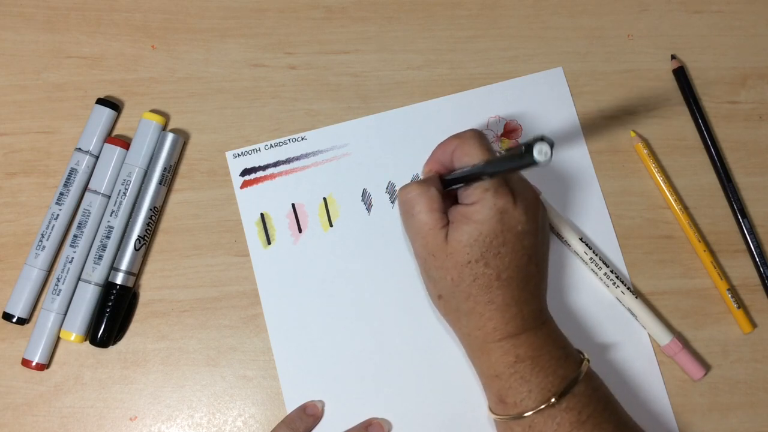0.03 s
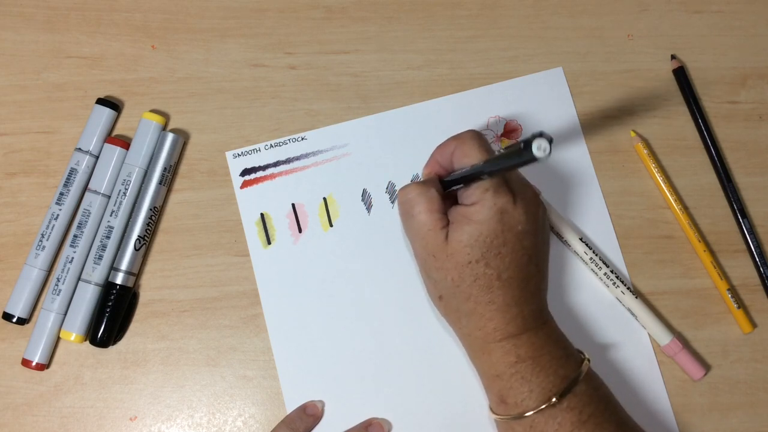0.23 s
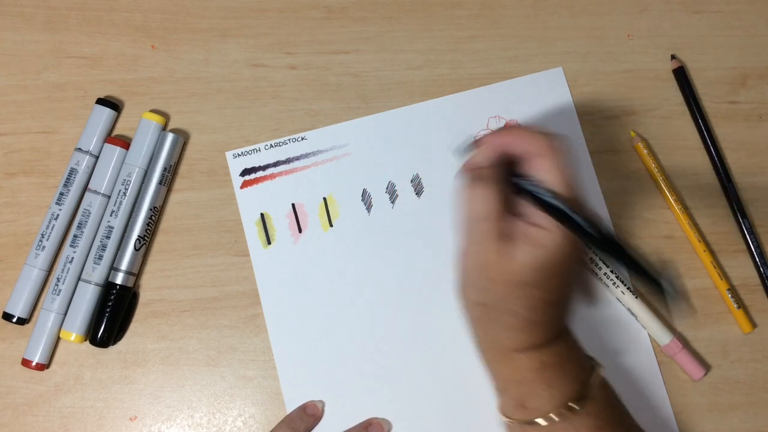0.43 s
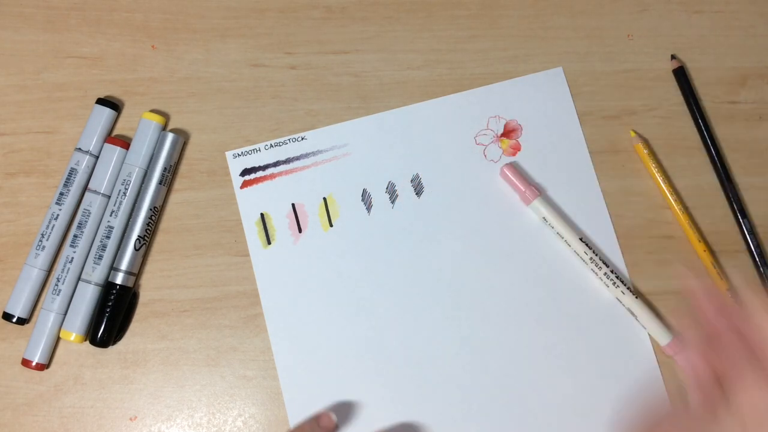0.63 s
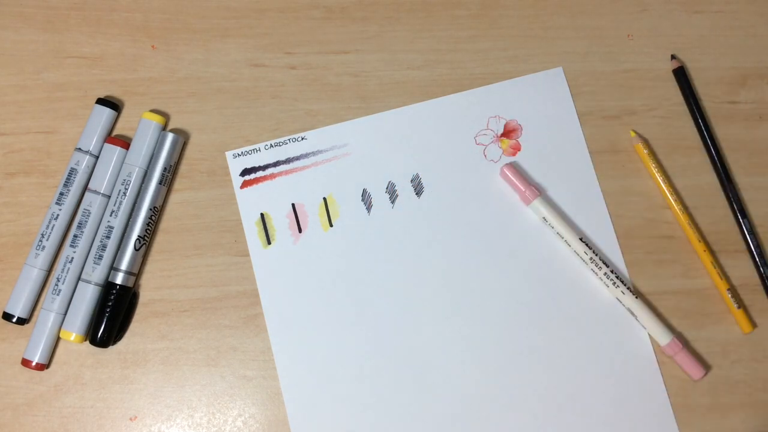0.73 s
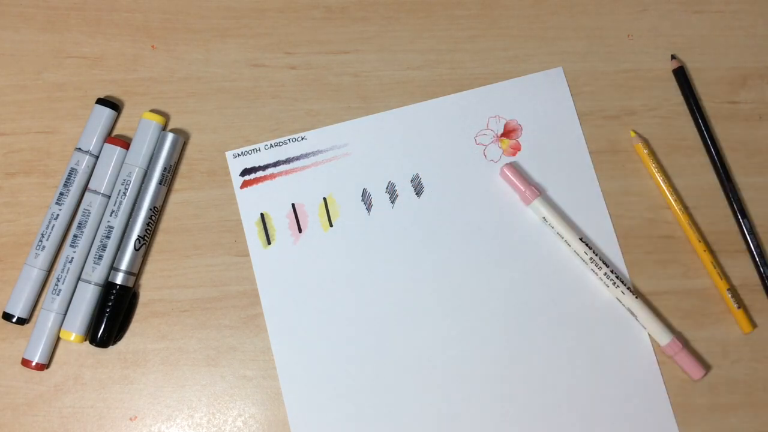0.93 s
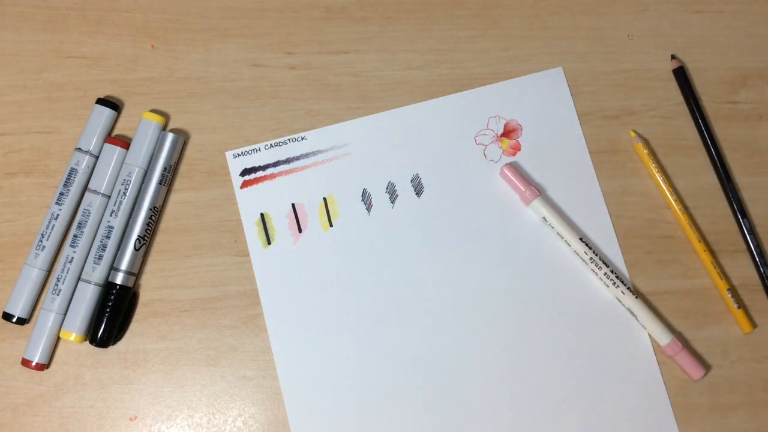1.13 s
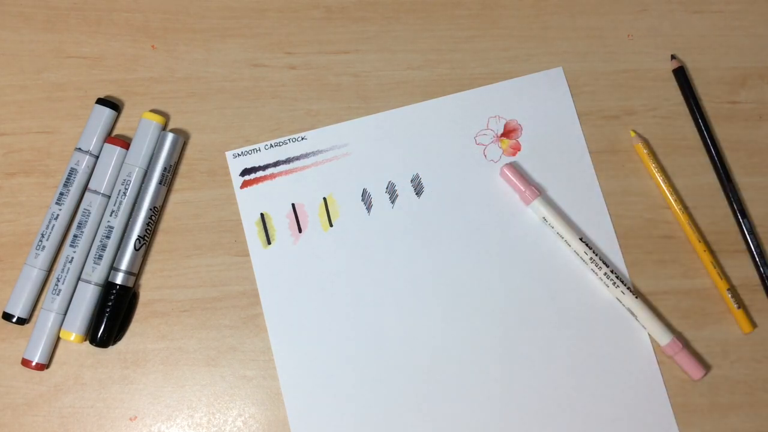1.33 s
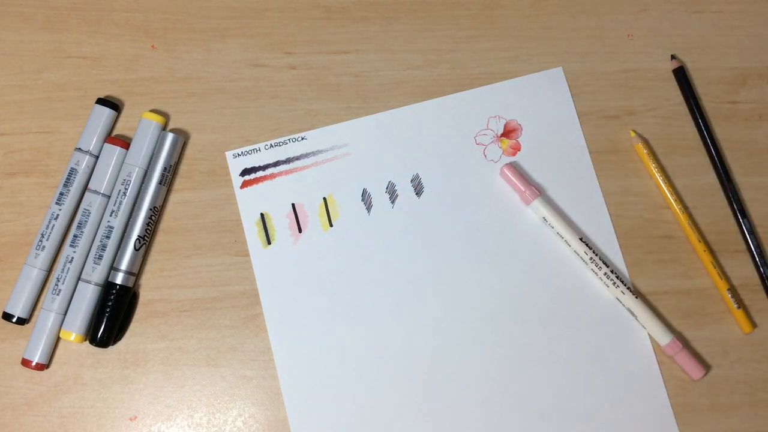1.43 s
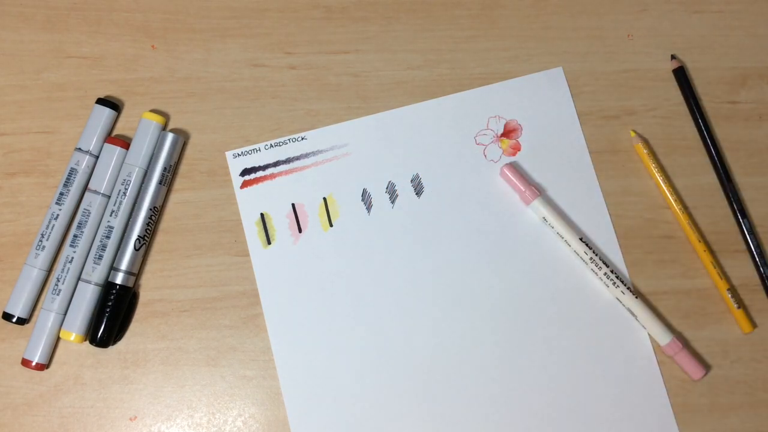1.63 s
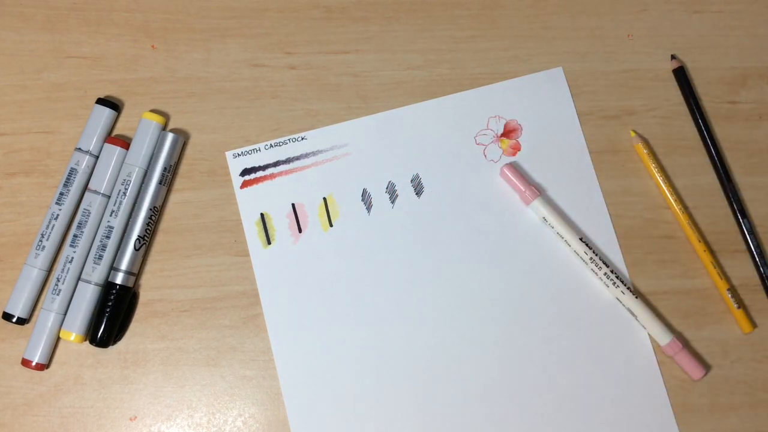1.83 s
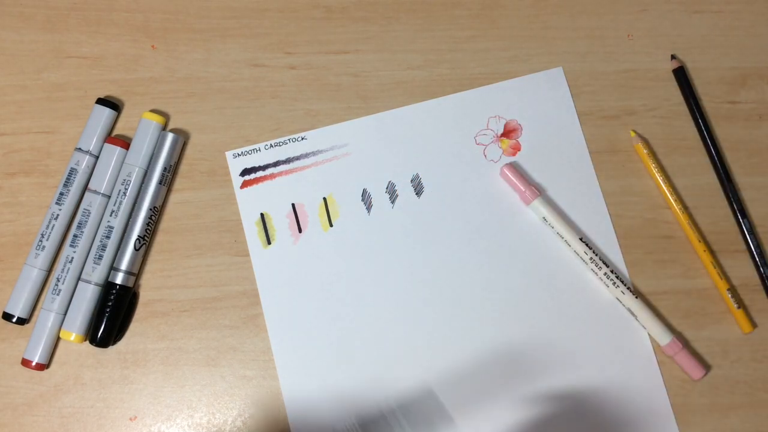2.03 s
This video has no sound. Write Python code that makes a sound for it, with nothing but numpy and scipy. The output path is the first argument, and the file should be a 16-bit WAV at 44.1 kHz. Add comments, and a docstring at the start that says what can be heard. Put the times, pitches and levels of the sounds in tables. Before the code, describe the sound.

Plastic pen clicks in a small quiet room, heard close: barely audible felt nib strokes, one light double-edged knock on wood, then about half a second later a quick rattling cluster with a tiny scrape and sharp final clack.

```python
"""Small quiet room, wooden desk: a felt pen makes four last strokes on paper, the hand moves off,
the pen knocks on the desk, then ticks, slides and clacks against other plastic pens. A fan hums.
Contacts excite decaying modes, the slide is a stream of tiny clicks, strokes and rustle are
filtered noise; the room adds a decaying noise tail."""
import sys
import numpy as np
from scipy import signal
from scipy.fft import rfft, irfft
from scipy.io import wavfile
from scipy.ndimage import uniform_filter1d

SR = 44100
rng = np.random.default_rng(int(sys.argv[2]) if len(sys.argv) > 2 else 0)


def waveform_to_disk(signal):
    """Save audio, clipped to [-1, 1], as 16-bit WAV at the path in sys.argv[1]."""
    frames = np.transpose(np.atleast_2d(signal))
    scaled = np.clip(frames, -1, 1) * 32767
    samples = np.round(scaled).astype(np.int16)
    wavfile.write(sys.argv[1], SR, samples)


def gain_from_decibels(decibels):
    """Convert decibel values to linear amplitude factors."""
    exponent = np.asarray(decibels, float) / 20
    return 10 ** exponent


N = 91463
T = np.arange(N) / SR


def level(x, db):
    """Scales x to an rms level in dB."""
    return x * gain_from_decibels(db) / np.sqrt(np.mean(x ** 2))


def band(x, hz, width):
    """Resonance with gain 1 at its centre."""
    return signal.lfilter(*signal.iirpeak(min(hz, .45 * SR), hz / width, SR), x)


def noise():
    """White noise, rms 1, over the whole scene."""
    return rng.standard_normal(N)


def curve(rows):
    """Gain over time from rows of (time [s], level [dB])."""
    return gain_from_decibels(np.interp(T, *np.array(rows).T))


def decay(t, t60):
    """Exponential decay by 60 dB in t60 seconds."""
    return np.exp(-np.log(1000) * t / t60)


def ring(modes):
    """Sum of decaying sine modes (frequency [Hz], level [dB], t60 [s]), peak 1."""
    t = T[:SR // 8]
    y = sum(gain_from_decibels(db) * np.sin(2 * np.pi * hz * t) * decay(t, t60) for hz, db, t60 in modes)
    return y / np.abs(y).max()


def add(out, x, s):
    """Mixes x into out from time s."""
    i = int(s * SR)
    out[i:i + len(x)] += x[:N - i]


PENS_LOW_HZ = 1857


def thin(x):
    """Small plastic bodies radiate little bass: high-pass."""
    return signal.sosfilt(signal.butter(3, PENS_LOW_HZ, "high", fs=SR, output="sos"), x)


# pen contacts, on other pens or the desk, and (1.8685 s, 1.885 s) echoes of the clack off the desk top: (time
# [s], level [dB], brightest frequency [Hz], barrel ring [Hz], ring level re click [dB])
PEN_CONTACTS = [(0.292, -63, 4900, 4800, 10.5), (.735, -57.5, 3170, 2250, 13),
                (1.094, -60, 11000, 11000, -3), (1.157, -52.5, 3480, 3200, 1),
                (1.192, -34.5, 6000, 3450, 7.5), (1.194, -35, 12590, 3140, 4.5),
                (1.1951, -28, 9000, 4240, -9), (1.660, -45.5, 8100, 4800, -6.5),
                (1.699, -51, 9000, 5560, -9), (1.7432, -35.5, 5630, 1710, 6.5),
                (1.7434, -39, 3440, 3100, 1.5), (1.754, -47, 6000, 3080, -1),
                (1.7740, -37, 4000, 1294, 7.5), (1.7750, -35, 6500, 5470, 2), (1.7838, -37, 6000, 5490, 0),
                (1.7898, -35.5, 4500, 2666, -3), (1.7918, -36.5, 4970, 1800, 3.5),
                (1.8254, -25, 11500, 5400, -10), (1.8277, -24, 8800, 8700, -6),
                (1.8309, -26, 8200, 2900, -8), (1.8645, -11, 8000, 650, -19), (1.8650, -8, 7200, 2740, -10),
                (1.8654, -9, 7000, 8300, -8), (1.8685, -16, 7000, 2790, -1), (1.872, -22, 5000, 2810, 4.5),
                (1.885, -41.5, 3500, 3050, 13), (2.005, -49.5, 10000, 9000, -4)]
# pen modes: (frequency [Hz], relative level [dB], t60 of the hardest contact [s])
PEN_MODES = [(2390, -21, 0.0059), (2764, 2.5, 0.04), (3305, -9, .01), (4064, -2.5, 0.02),
             (4680, -7.5, 0.0096), (5100, -7, 0.007), (5490, -22.5, .01), (5960, 0, 0.019),
             (6350, -6, 0.012), (7000, -4, .006), (8040, -0.5, .006), (8620, -5, 0.012),
             (10000, -19.5, 0.0048), (12800, -40, 0.0021), (14400, -23.5, .005)]
FOCUS_OCTAVES = 1.1  # a mode this far from the brightest frequency is 6 dB down
SCATTER_DB, DETUNE = 2.5, .01  # random spread of the modes per contact, detune as a fraction
DAMPING_DB_PER_DB = 1  # lighter contacts ring shorter
CHATTER_DB, CHATTER_S = 0, .00015
CRACK_DB = 6  # re contact level
RING_T60_S = .009
PATHS = 3  # cracks take turns among three noise tails, so the summed tail stays smooth


def pen_contacts():
    """A contact cracks, chatters into modes near its brightest frequency and rings a barrel."""
    cracks, body, barrel = np.zeros((PATHS, N)), np.zeros(N), np.zeros(N)
    t = T[:128]
    hardest_db = max(row[1] for row in PEN_CONTACTS)
    for i, (s, db, bright_hz, ring_hz, ring_db) in enumerate(PEN_CONTACTS):
        damping = gain_from_decibels(DAMPING_DB_PER_DB * (db - hardest_db))
        modes = []
        for hz, mode_db, t60 in PEN_MODES:
            detune, scatter = rng.standard_normal(2)
            focus_db = -6 * (np.log2(hz / bright_hz) / FOCUS_OCTAVES) ** 2
            modes.append((hz * (1 + DETUNE * detune), mode_db + SCATTER_DB * scatter + focus_db, t60 * damping))

        signs = np.sign(rng.standard_normal(len(t)))
        chatter = signs * t / CHATTER_S * np.exp(-t / CHATTER_S)
        push = (t == 0) + gain_from_decibels(CHATTER_DB) * chatter
        click = np.convolve(ring(modes), push)
        add(body, gain_from_decibels(db) * click / np.abs(click).max(), s)

        crack = band(band(push, bright_hz, bright_hz), bright_hz, 1.8 * bright_hz)
        add(cracks[i % PATHS], gain_from_decibels(db + CRACK_DB) * crack, s)

        rise = np.clip(T[:SR // 8] * ring_hz / 2, 0, 1)  # over two cycles
        add(barrel, gain_from_decibels(db + ring_db) * rise * ring([(ring_hz, 0, RING_T60_S)]), s)
    return thin(cracks), thin(body) + barrel


# scrape before the high-pass: (time [s], level [dB])
SLIDE_LEVEL = [(1.776, -47), (1.788, -57.5), (1.792, -48), (1.81, -54), (1.822, -41), (1.835, -41.5),
               (1.85, -74), (1.862, -48), (1.87, -79)]
SLIDE_PER_S, SLIDE_SPREAD_DB, SCRAPE_T60_S = 6000, 2.5, 0.0009


def slide():
    """One barrel scrapes along another: random tiny clicks excite short pen modes."""
    hits = rng.random(N) < SLIDE_PER_S / SR
    grains = hits * np.sign(noise()) * gain_from_decibels(SLIDE_SPREAD_DB * rng.exponential(size=N))
    modes = [(hz, db / 2, SCRAPE_T60_S) for hz, db, _ in PEN_MODES]
    scrape = signal.fftconvolve(grains, ring(modes))[:N]
    sliding = (T > SLIDE_LEVEL[0][0]) & (T < SLIDE_LEVEL[-1][0])
    return thin(curve(SLIDE_LEVEL) * sliding * level(scrape, 0))


# contacts of the knock: (time [s], relative level [dB], push time constant [ms])
KNOCK_CONTACTS = [(1.1923, -23, .08), (1.1933, -24, .08), (1.1947, -19, .12), (1.1954, -17, .1)]
# soft bumps on the desk: (time [s], relative level [dB], push time constant [ms])
DESK_BUMPS = [(0.733, -27, 0.82), (0.987, -24.5, 1), (1.826, -32, 0.061), (1.864, -28.5, 0.21)]
# desk modes: (frequency [Hz], relative level [dB], t60 [s])
DESK_MODES = [(199, -26, 0.016), (351, -8.5, 0.028), (510, -6, 0.02), (737, 1, 0.012), (1184, 3.5, 0.017),
              (1528, 11.5, 0.013), (2310, -8.5, 0.013), (3450, 2, 0.013)]
# pen body ringing on from the last knock contact: (frequency [Hz], level [dB], t60 [s])
PEN_BODY_RING = (1915, -29, .036)


def desk():
    """Each contact pushes the desk modes; a longer push is duller."""
    out, body = np.zeros(N), ring(DESK_MODES)
    for s, db, push_ms in KNOCK_CONTACTS + DESK_BUMPS:
        u = T[:256] * 1000 / push_ms
        push = u * np.exp(-u)
        add(out, -gain_from_decibels(db) * np.convolve(body, push / push.sum()), s)
    hz, db, t60 = PEN_BODY_RING
    add(out, -gain_from_decibels(db) * ring([(hz, 0, t60)]), KNOCK_CONTACTS[-1][0])
    return signal.sosfilt(signal.butter(2, 140, "high", fs=SR, output="sos"), out)


# nib strokes: (start [s], length [s], level [dB])
NIB_STROKES = [(0.018, 0.053, -70.5), (0.118, 0.054, -68.5), (0.228, 0.031, -71), (0.317, 0.037, -72)]
# nib hiss: (frequency [Hz], width [Hz], relative gain [dB])
NIB_BANDS = [(1000, 1700, 1.5), (6000, 1200, -1.5), (7750, 540, 5), (9700, 820, -0.5), (12500, 2400, -10)]
STROKE_EDGE_S = 0.0072


def nib():
    """The felt nib rubs the paper: resonant noise bands gated by short strokes."""
    strokes = np.zeros(N)
    for s, length, db in NIB_STROKES:
        inside_s = np.minimum(T - s, s + length - T)
        strokes += gain_from_decibels(db) * np.clip(inside_s / STROKE_EDGE_S, 0, 1)
    hiss = sum(gain_from_decibels(db) * band(noise(), hz, width) for hz, width, db in NIB_BANDS)
    return strokes * level(hiss, 0)


# side of the hand on the paper: (time [s], level [dB])
HAND_LEVEL = [(0, -71), (.06, -82), (.1, -72), (.18, -61.5), (.23, -76), (.33, -72), (.42, -74),
              (.55, -71.5), (.65, -98)]
HAND_HZ, HAND_WIDTH_HZ = 513, 150


def hand_rub():
    """The side of the hand rubs over the paper: a low noise band."""
    return curve(HAND_LEVEL) * level(band(noise(), HAND_HZ, HAND_WIDTH_HZ), 0)


# hand and sleeve, before the flicker: (time [s], level [dB])
RUSTLE_LEVEL = [(.4, -110), (.53, -80), (.65, -74), (.72, -80), (.745, -74), (.8, -84), (.93, -73),
                (.985, -66.5), (1.005, -100), (1.15, -77), (1.3, -78.5), (1.35, -74), (1.52, -75),
                (1.56, -103)]
RUSTLE_HZ, RUSTLE_WIDTH_HZ = 10000, 20100
FLICKER_RMS_DB = 2.5


def rustle():
    """Hand and sleeve rustle unevenly: broad noise whose level wanders."""
    wander = level(uniform_filter1d(noise(), size=SR // 100), 0)  # 10 ms mean
    flicker = gain_from_decibels(FLICKER_RMS_DB * wander)
    return curve(RUSTLE_LEVEL) * flicker * level(band(noise(), RUSTLE_HZ, RUSTLE_WIDTH_HZ), 0)


# room tail: (frequency [Hz], initial level [dB], t60 [s])
TAIL_BANDS = [(298, -45.5, 0.12), (620, -45.5, 0.27), (1140, -46, 0.21), (2480, -46, 0.34),
              (4800, -45, 0.23), (9000, -46.5, 0.26), (14060, -53.5, 0.1)]
TAIL_RISE_S = 0.0012
EARLY_DB, EARLY_T60_S = -28.5, 0.043


def room(x):
    """Dense reflections off the desk top plus noise bands dying at their own rates."""
    t = T[:SR // 2]
    tail = gain_from_decibels(EARLY_DB) * noise()[:len(t)] * decay(t, EARLY_T60_S)
    for hz, db, t60 in TAIL_BANDS:
        hiss = level(band(band(noise(), hz, hz), hz, hz), 0)[:len(t)]
        tail += gain_from_decibels(db) * hiss * decay(t, t60)
    tail *= np.clip(t / TAIL_RISE_S, 0, 1)
    return x + signal.fftconvolve(x, tail)[:N]


# air spectrum: (frequency [Hz], relative density [dB])
AIR_SPECTRUM = [(15, -28), (25, -12.5), (70, -1.5), (170, -13), (560, -10), (818, -13), (1100, -11),
                (1940, -13.5), (5730, -32), (13200, -33.5), (16000, -53)]
AIR_DB = -62


def air():
    """Room air: noise shaped in the spectrum."""
    f = np.maximum(np.fft.rfftfreq(N, 1 / SR), 1)
    hz, db = np.array(AIR_SPECTRUM).T
    bed = irfft(rfft(noise()) * gain_from_decibels(np.interp(np.log(f), np.log(hz), db)), N)
    return level(bed, AIR_DB)


# fan bands: (frequency [Hz], width [Hz], level before the fade [dB])
FAN_BANDS = [(560, 20, -74.5), (1041, 36, -71), (1330, 43, -76)]
FAN_FADE_DB_PER_S = -4.5
HUM_HZ, HUM_FILTER_WIDTH_HZ, HUM_DB = 71.1, 6.9, -65


def fan():
    """A wavering low hum (noise filtered twice) and narrow noise bands that fade."""
    hum = band(band(noise(), HUM_HZ, HUM_FILTER_WIDTH_HZ), HUM_HZ, HUM_FILTER_WIDTH_HZ)
    whirr = sum(level(band(noise(), hz, width), db) for hz, width, db in FAN_BANDS)
    return level(hum, HUM_DB) + gain_from_decibels(FAN_FADE_DB_PER_S * T) * whirr


RING_WET_DB = -13  # narrow rings reach the room weaker than the crack
DESK_WET_DB = -9


def scene():
    """Mixes all sources; rings and knock stay at full direct level but feed the room less."""
    cracks, rings = pen_contacts()
    cracks[0] += slide()
    knock = desk()
    ring_wet, desk_wet = gain_from_decibels(RING_WET_DB), gain_from_decibels(DESK_WET_DB)
    mix = sum(room(path) for path in cracks)  # a new noise tail for each
    mix = mix + room(ring_wet * rings + desk_wet * knock)
    mix = mix + (1 - ring_wet) * rings + (1 - desk_wet) * knock
    mix = mix + nib() + hand_rub() + rustle() + air() + fan()
    return mix[None]


def band_limit(x):
    """A steep low-pass at the top of the band."""
    return signal.sosfilt(signal.butter(12, 16930, fs=SR, output="sos"), x)


def record(dry):
    """Delivers the finished mix."""
    return band_limit(dry)


dry = scene()
out = record(dry)
waveform_to_disk(out)
```